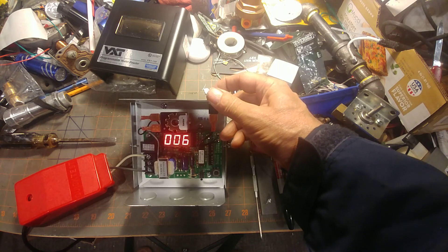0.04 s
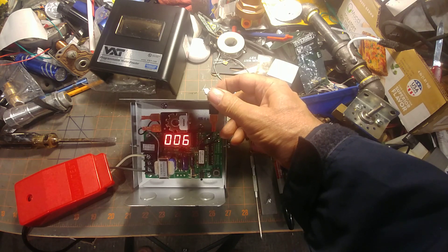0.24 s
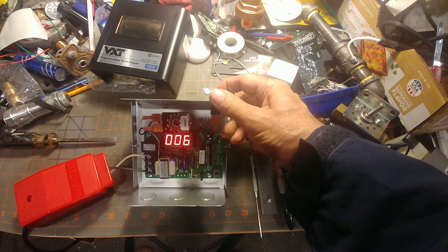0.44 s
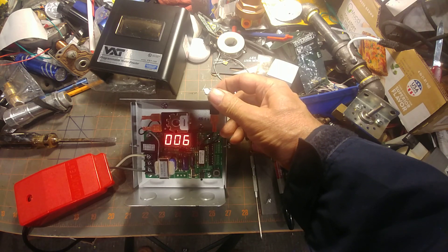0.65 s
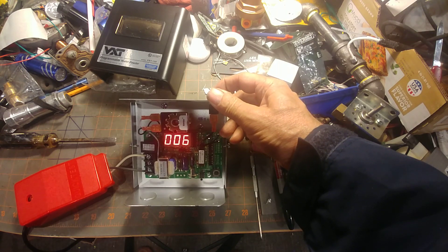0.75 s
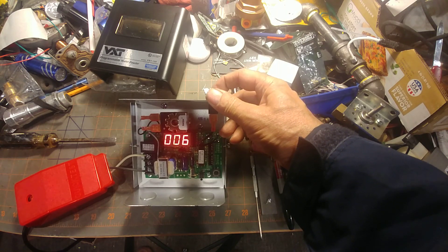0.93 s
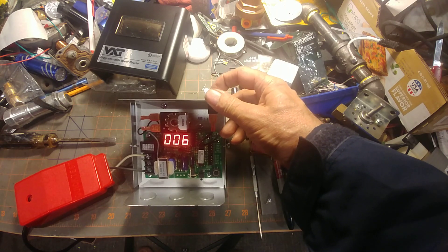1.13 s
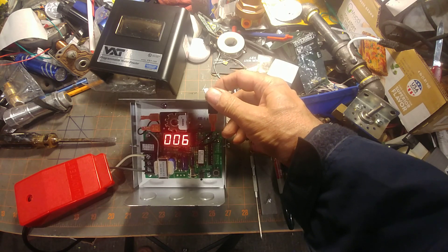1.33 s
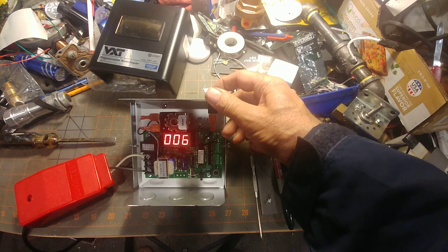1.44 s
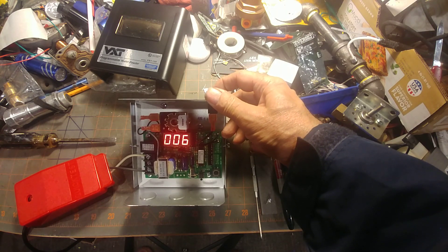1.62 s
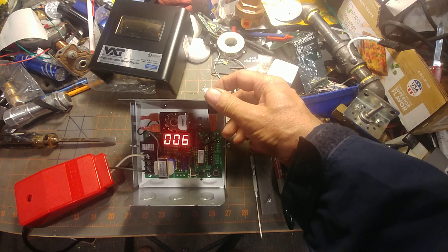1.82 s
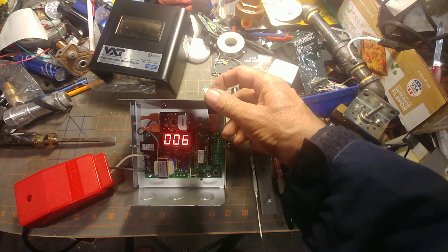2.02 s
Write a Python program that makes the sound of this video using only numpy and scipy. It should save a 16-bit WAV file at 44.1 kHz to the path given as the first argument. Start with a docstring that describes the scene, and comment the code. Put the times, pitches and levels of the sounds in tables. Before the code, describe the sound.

Close up in a quiet workshop, a solenoid valve switches on and off twice with crisp relay and plunger clicks. While on, it gives a low hum, irregular metallic ticking and light water flow. The last release thumps softly.

```python
"""A faint scuff over quiet workshop air, then a relay clicks and a solenoid plunger slams home.
A small water valve, close up on a workbench, is switched on and off twice. While it is on, the coil
hums, the armature chatters with the mains and a little water rushes. Then the relay lets go and the
plunger springs back; the second release comes with a dull thump on the bench.
Metal contacts are coloured noise bursts plus decaying modes; some add an impulse with echoes."""
import sys
import numpy as np
from scipy import signal
from scipy.fft import rfft, irfft, next_fast_len
from scipy.io import wavfile

SR = 44100
rng = np.random.default_rng(int(sys.argv[2]) if len(sys.argv) > 2 else 0)


def pcm_store(signal):
    """Save signal as 16-bit PCM."""
    levels = np.round(np.clip(np.atleast_2d(signal), -1, 1) * 32767)
    wavfile.write(sys.argv[1], SR, levels.astype(np.int16).T)


N = 91331

MAINS_HZ, ROOM_T60_S = 60, .17
RELAY_ATTACK_S, SLAM_ATTACK_S, RELEASE_SNAP_DB = .0005, .0009, 7

# coil energised (on [s], off [s])
RUNS_S = [(.174, 1.015), (1.416, 2.06)]
# events, bounces included (time [s], level [dB])
SCUFF_EVENTS = [(.093, -71), (1.373, -46)]
RELAY_CLOSES = [(.1476, -21.5), (.1535, -20), (1.3957, -15.5), (1.4015, -23)]
PLUNGER_SLAMS = [(.1606, -10.5), (1.4112, -9)]
ARMATURE_TICKS = [(.2306, -34), (.2576, -35), (.2751, -38), (.3071, -36), (.331, -40), (.3588, -37),
                  (.3973, -33), (.4486, -37), (.4818, -34), (.5001, -31), (.5393, -38), (.5571, -39),
                  (.5896, -39), (.5968, -35), (.6343, -27), (.6494, -29), (.7166, -38), (.7319, -32),
                  (.765, -36), (.7853, -38), (.8911, -36), (.9466, -38), (1.4906, -34), (1.4984, -35),
                  (1.5332, -30), (1.5507, -31), (1.5554, -31), (1.5661, -30), (1.5839, -35), (1.5974, -37),
                  (1.6321, -32), (1.6648, -34), (1.715, -34), (1.7336, -34), (1.7657, -33), (1.7831, -34),
                  (1.7982, -35), (1.8313, -36), (1.8502, -34), (1.8644, -36), (1.8837, -30), (1.9335, -30),
                  (1.9402, -35), (1.9997, -35)]
ARMATURE_RATTLES = [(.3678, -28.5), (.4592, -29.5), (.5005, -38), (.6012, -28), (.6177, -25.5), (.638, -31),
                    (.6602, -24.5), (.9, -32.5), (1.6765, -30.5), (1.8108, -31.5), (1.9617, -30)]
RELAY_OPENS = [(.9652, -30.5), (.9715, -24.5), (.9755, -23), (2.0095, -16.5), (2.0135, -18)]
PLUNGER_RETURNS = [(1.0097, -24.5), (1.0215, -33), (2.0556, -22), (2.0612, -29.5)]
# armature chatter contour (time [s], level [dB])
CHATTER_CONTOUR = [(.2, -42.5), (.33, -50.5), (.43, -58), (.58, -50), (.68, -43), (.8, -49.5), (.88, -72),
                   (.92, -62), (1.45, -42), (1.52, -59), (1.58, -45), (2.0, -45.5)]
# coil hum (mains multiple [1], level [dB])
HUM_HARMONICS = [(1, -72), (2, -50.5), (3, -77.5), (6, -73)]

# resonances (frequency [Hz], level [dB], t60 [s])
RELAY_MODES = [(2293, -9, .05), (2412, -5, .08), (3095, -8, .1), (4005, -2, .1), (4600, -5, .05),
               (4953, 2, .08), (5200, -5, .045), (7450, -6, .05)]
VALVE_BODY_MODES = [(790, -13, .07), (1047, -4, .085), (1470, -10, .06), (2325, -7, .06), (2425, -1, .07),
                    (2627, -5, .07), (4010, -2, .08), (4216, -4, .07), (6440, -1, .09), (6860, -4, .08),
                    (8020, -6, .08), (9050, -9, .06)]
ARMATURE_MODES = [(1185, -6, .08), (1290, -11, .06), (3990, -11, .09), (5895, -2, .14), (5985, -5, .14),
                  (6570, -7, .07), (7460, -5, .12), (7730, 0, .1), (7835, 0, .11), (8020, -5, .1)]
BENCH_MODES = [(130.2, -6.5, .11), (170, 2, .054), (306, 4, .022), (462, 1.5, .028), (591, -5.5, .039)]

# source spectra (frequency [Hz], relative level [dB])
AIR_SPECTRUM = [(20, -21), (40, -11), (62, 5), (85, -3), (120, 1.5), (170, -4), (300, -8), (600, -12.5),
                (1500, -18), (4000, -19), (9000, -25), (11000, -31.5), (16000, -17.5)]
SCUFF_SPECTRUM = [(300, -22), (1200, 5), (4000, 7.5), (7500, 1), (11000, -18.5)]
RELAY_CLOSE_SPECTRUM = [(180, -82.5), (300, -45.5), (915, -35), (1410, -20), (2210, -30.5), (2610, -35),
                        (3400, -20), (4090, -3.5), (4990, -4), (6410, -19.5), (8360, -9), (9550, -23),
                        (10700, -49.5), (15000, -24.5), (16000, -10.5)]
SLAM_SPECTRUM = [(60, -39.5), (300, -37), (560, -38), (680, -15), (790, -6), (930, -14.5), (1050, -9),
                 (1650, -7), (1900, -14.5), (2150, -9), (2400, 0), (2700, -12.5), (3050, -13.5),
                 (3650, -12), (4100, -3.5), (4750, -16.5), (5600, -11.5), (6700, 2), (8000, -7), (9300, -7),
                 (10600, -33), (12100, -24), (15500, -22)]
WATER_SPECTRUM = [(25, -28), (42, -20.5), (60, 7), (80, 2), (140, -3.5), (190, -3.5), (280, 1), (355, 0),
                  (450, -10.5), (800, -10.5), (1250, -9), (1700, -14), (2600, -20), (4500, -22),
                  (7800, -3.5), (11000, -31)]
SNAP_SPECTRUM = [(700, -31), (1250, -9), (2000, -26.5), (3400, -26), (5000, -21), (6000, -8.5),
                 (7000, -7.5), (7900, 2), (8900, 1.5), (9900, -5.5), (10800, -26.5), (13500, -15.5),
                 (15500, -18.5)]
TICK_SPECTRUM = [(400, -33), (800, -12), (1000, -21.5), (1200, -4), (1700, -16), (2300, -23.5),
                 (3400, -19.5), (4050, -12), (4700, -18.5), (5600, -11), (5900, -2.5), (6150, -15.5),
                 (6550, -7), (7100, -16.5), (7500, -4), (7820, 3.5), (8150, -11), (9200, -9.5),
                 (11000, -35.5), (14000, -21), (16000, -27)]
RATTLE_SPECTRUM = [(350, -54.5), (600, -20.5), (919, -28), (1080, -11.5), (1230, -5.5), (2150, -25.5),
                   (3120, -21), (3340, -33), (3990, -8), (4650, -14.5), (5560, -2.5), (5870, 1.5),
                   (6640, 0.5), (7020, -8.5), (7730, 7), (8740, -2.5), (10200, -8), (10900, -20),
                   (13600, -7), (16000, -9.5)]
RELAY_OPEN_SPECTRUM = [(290, -51.5), (500, -18.5), (960, -22), (1420, -10), (1840, -14.5), (2390, -6.5),
                       (3150, -8.5), (3440, -14.5), (4030, -1.5), (4940, -1.5), (6420, -8), (7420, -7.5),
                       (10500, -22.5), (14000, -13), (16000, -20)]
RETURN_SPECTRUM = [(240, -20.5), (400, -14), (570, -33), (1490, -8.5), (2000, -10.5), (2400, -0.5),
                   (3210, -26), (3870, -7), (5780, -15), (6340, -6.5), (9320, -23), (10900, -35),
                   (12900, -13.5), (15300, -14), (16000, -15)]

# stereo width (frequency [Hz], side over mid [dB])
STEREO_WIDTH = [(100, -14), (700, -11), (1300, -9), (2400, -3), (4400, -1), (8000, -1), (15000, 0)]
# stereo balance (frequency [Hz], left over right [dB])
STEREO_BALANCE = [(100, -4), (400, -3.5), (1000, -2), (2400, -1), (4400, -1), (8000, -4.5), (15000, 1)]


def amp(db):
    """Decibels to gain."""
    return 10 ** (np.asarray(db) / 20)


def unit(x):
    """Scale to rms 1."""
    return x / np.sqrt(np.mean(x ** 2) + 1e-20)


def gain_at(curve, hz):
    """Gain of a (Hz, dB) curve, read on a log axis."""
    knots_hz, db = np.transpose(curve)
    return amp(np.interp(np.log(hz + 1), np.log(knots_hz + 1), db))


def filtered(x, gain):
    """Zero-phase filter with response gain(hz)."""
    size = next_fast_len(x.shape[-1] + 8192)
    return irfft(rfft(x, size) * gain(np.fft.rfftfreq(size, 1 / SR)), size)[..., :x.shape[-1]]


def coloured(x, spectrum, size=4096):
    """Minimum-phase colouring; keeps the power of white noise."""
    gain = unit(gain_at(spectrum, np.fft.rfftfreq(size, 1 / SR)))
    cepstrum = irfft(np.log(gain + 1e-6))
    cepstrum[1:size // 2] *= 2
    cepstrum[size // 2 + 1:] = 0
    response = irfft(np.exp(rfft(cepstrum)))
    return signal.fftconvolve(x, response[None], axes=1)[:, :x.shape[1]]


def width_rad(hz):
    """Mid/side angle; 0 is mono."""
    return np.arctan(gain_at(STEREO_WIDTH, hz))


def stereo_noise(count):
    """White noise, nearly mono in the bass, wide in the treble."""
    split = lambda hz: np.array([np.cos(width_rad(hz)), np.sin(width_rad(hz))])
    mid, side = filtered(rng.standard_normal((2, count)), split)
    return np.array([mid + side, mid - side])


def onset(t, attack_s):
    """Smooth rise, 0 to 1."""
    return 1 - np.exp(-(t / attack_s) ** 2)


def contact(spectrum, attack_s, crack_t60_s, ring_db, ring_t60_s, room_db, pan_db):
    """Noise burst: crack, dense ring of the parts, room tail. Negative pan is right."""
    t = np.arange(SR // 3) / SR
    decays = [(0, crack_t60_s), (ring_db, ring_t60_s), (room_db, ROOM_T60_S)]
    power = sum(amp(db - 60 * t / t60_s) ** 2 for db, t60_s in decays)
    envelope = np.sqrt(power) * onset(t, attack_s)
    burst = stereo_noise(len(t)) * envelope / envelope.max()
    return coloured(burst, spectrum) * amp([[pan_db / 2], [-pan_db / 2]])


def ring(modes, level_db, attack_s=.00033):
    """Decaying modes; the higher ones reach the two microphones out of step."""
    t = np.arange(SR // 3) / SR
    out = 0
    for hz, db, t60_s in modes:
        phase = rng.uniform(0, 2 * np.pi) + np.array([[1], [-1]]) * rng.choice([-1, 1]) * width_rad(hz)
        envelope = amp(level_db + db + rng.normal() - 60 * t / t60_s)
        out = out + envelope * np.sin(2 * np.pi * hz * t + phase)
    return out * onset(t, attack_s)


def snap(echoes=7, echo_db=-14, near_s=.0008, far_s=.0055):
    """Hard, instant contact with echoes off things on the bench."""
    x = np.zeros((2, SR // 3))
    x[0, 1], x[1, 0] = 1, 1  # right leads by one sample
    delays_s = np.linspace(near_s, far_s, echoes) * rng.uniform(.9, 1.1, (2, echoes))
    x[[[0], [1]], (delays_s * SR).astype(int)] += amp(echo_db) * rng.choice([-1, 1], (2, echoes))
    return coloured(x, SNAP_SPECTRUM) * amp([[-3], [3]])


def play(events, sound):
    """Place sound() at each (time [s], level [dB])."""
    out = np.zeros((2, N + SR))
    for time_s, db in events:
        x = sound()
        out[:, round(time_s * SR):][:, :x.shape[-1]] += amp(db) * x
    return out[:, :N]


def air(level_db=-67):
    """Steady, quiet workshop noise."""
    return amp(level_db) * unit(coloured(stereo_noise(N), AIR_SPECTRUM))


def scuffs():
    """A soft scuff ahead of each switch-on."""
    return play(SCUFF_EVENTS, lambda: contact(SCUFF_SPECTRUM, attack_s=.034, crack_t60_s=.36,
                                              ring_db=-5, ring_t60_s=.15, room_db=-14, pan_db=-3))


def relay():
    """Contacts bounce: bright clicks on closing, dry snaps on letting go."""
    def close():
        click = contact(RELAY_CLOSE_SPECTRUM, RELAY_ATTACK_S, crack_t60_s=.0087,
                        ring_db=-7.5, ring_t60_s=.05, room_db=-12.5, pan_db=-1.5)
        return click + ring(RELAY_MODES, level_db=-15, attack_s=.0011)

    def let_go():
        click = contact(RELAY_OPEN_SPECTRUM, RELAY_ATTACK_S, crack_t60_s=.017,
                        ring_db=-6.5, ring_t60_s=.055, room_db=-11, pan_db=-2)
        return click + ring(RELAY_MODES, level_db=-7, attack_s=.00053) + amp(RELEASE_SNAP_DB) * snap()

    return play(RELAY_CLOSES, close) + play(RELAY_OPENS, let_go)


def plunger():
    """Plunger hits its seat, later springs back and bounces; each blow rings the valve body."""
    def slam():
        blow = contact(SLAM_SPECTRUM, SLAM_ATTACK_S, crack_t60_s=.012,
                       ring_db=-16, ring_t60_s=.065, room_db=-24.5, pan_db=-.7)
        return blow + ring(VALVE_BODY_MODES, level_db=-14, attack_s=.0022)

    def spring_back():
        blow = contact(RETURN_SPECTRUM, SLAM_ATTACK_S, crack_t60_s=.055,
                       ring_db=-2.5, ring_t60_s=.073, room_db=-21.5, pan_db=-1)
        body = ring(VALVE_BODY_MODES, level_db=-15.5, attack_s=.0023)
        return blow + body + amp(RELEASE_SNAP_DB) * snap()

    return play(PLUNGER_SLAMS, slam) + play(PLUNGER_RETURNS, spring_back)


def energised(rise_s=.025, fall_s=.036):
    """How far the valve is on, 0 to 1."""
    t = np.arange(N) / SR
    return sum(np.clip((t - on_s) / rise_s, 0, 1) * np.clip(1 - (t - off_s) / fall_s, 0, 1)
               for on_s, off_s in RUNS_S)


def coil():
    """Mains hum, strongest at the second harmonic."""
    t = np.arange(N) / SR
    hum = sum(amp(db) * np.sqrt(2) * np.sin(2 * np.pi * (k * MAINS_HZ * t + rng.random()))
              for k, db in HUM_HARMONICS)
    return energised() * hum


def water(level_db=-52):
    """Light rush through the open valve."""
    return amp(level_db) * energised() * unit(coloured(stereo_noise(N), WATER_SPECTRUM))


def chatter_events(jitter_s=.00056, spread_db=1.5, flutter_db=-3):
    """Faint mains-locked contacts, one and four per cycle: (time [s], level [dB])."""
    events = []
    for on_s, off_s in RUNS_S:
        for per_cycle, db in ((1, 0), (4, flutter_db)):
            late, weak = rng.standard_normal((2, SR // 100))
            times_s = on_s + np.arange(len(late)) / (per_cycle * MAINS_HZ) + jitter_s / per_cycle * late
            levels_db = np.interp(times_s, *np.transpose(CHATTER_CONTOUR)) + db - spread_db * weak
            held = times_s < off_s - .05
            events += zip(times_s[held], levels_db[held])
    return events


def armature(snap_db=13):
    """The held armature chatters with the mains, ticks sharply on some cycles, at times rattles."""
    click = amp(snap_db) * snap()
    to_right = amp([[-2], [2]])

    def tick(burst_db=-8.5):
        burst = contact(TICK_SPECTRUM, attack_s=.0015, crack_t60_s=.025,
                        ring_db=0, ring_t60_s=.056, room_db=-18.5, pan_db=-3)
        return click + amp(burst_db) * burst + to_right * ring(ARMATURE_MODES, level_db=-19)

    def rattle():
        burst = contact(RATTLE_SPECTRUM, attack_s=.0012, crack_t60_s=.015,
                        ring_db=14, ring_t60_s=.055, room_db=-44, pan_db=-2)
        return burst + to_right * ring(ARMATURE_MODES, level_db=-12)

    chatter_ticks = [tick(burst_db=-8) for _ in range(4)]
    chatter = lambda: chatter_ticks[rng.integers(len(chatter_ticks))]
    return play(ARMATURE_RATTLES, rattle) + play(ARMATURE_TICKS, tick) + play(chatter_events(), chatter)


def bench(start_s=2.0255, level_db=-18, attack_s=.0023, highpass_hz=125):
    """A dull, soft thump rings the bench briefly."""
    t = np.arange(SR // 3) / SR
    modes = sum(amp(db - 60 * t / t60_s) * np.sin(2 * np.pi * hz * t) for hz, db, t60_s in BENCH_MODES)
    highpass = signal.butter(3, highpass_hz, "high", fs=SR, output="sos")
    thump = signal.sosfilt(highpass, modes * onset(t, attack_s))
    return play([(start_s, level_db)], lambda: thump) * amp([[-1.2], [1.2]])


def scene():
    """All sources; the valve sits a little to the right."""
    mix = air() + scuffs() + relay() + plunger() + coil() + water() + bench() + armature()
    return filtered(mix, lambda hz: gain_at(STEREO_BALANCE, hz) ** np.array([[.5], [-.5]]))


def record(dry, cutoff_hz=15900):
    """Steep low-pass band limit."""
    return signal.sosfilt(signal.ellip(10, .1, 80, cutoff_hz, fs=SR, output="sos"), dry)


dry = scene()
out = record(dry)
pcm_store(out)
```